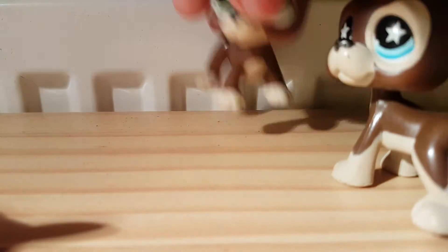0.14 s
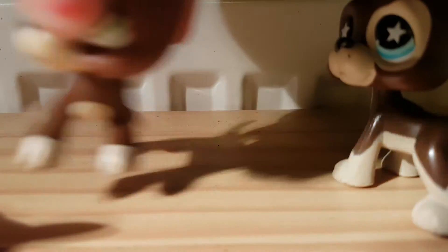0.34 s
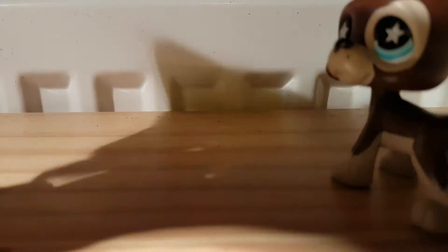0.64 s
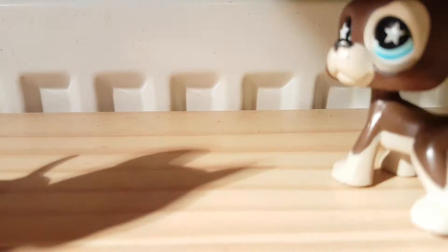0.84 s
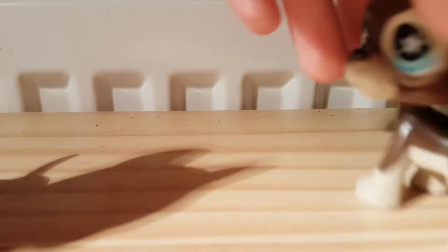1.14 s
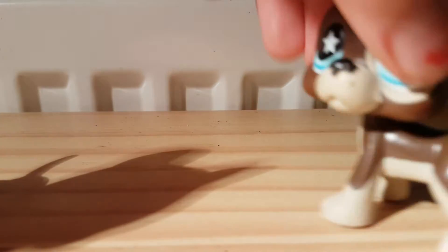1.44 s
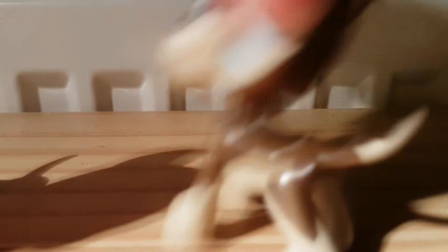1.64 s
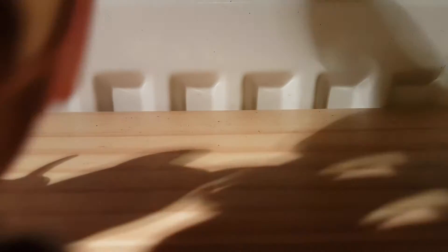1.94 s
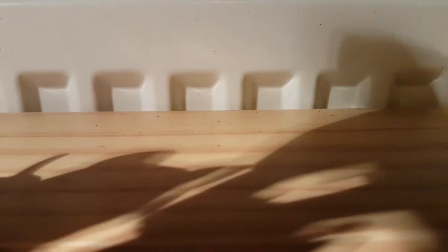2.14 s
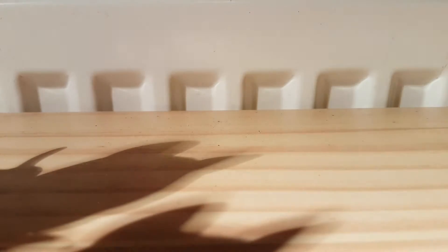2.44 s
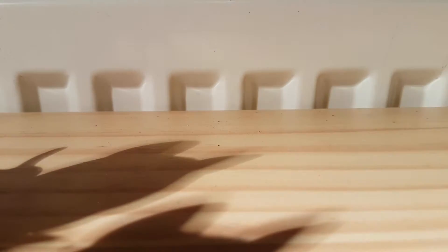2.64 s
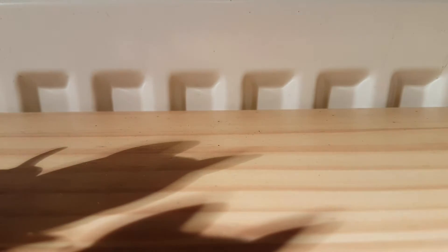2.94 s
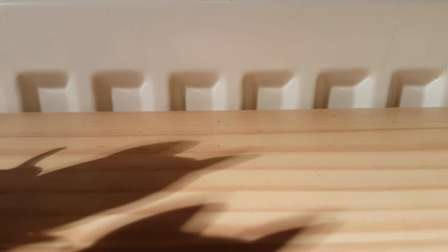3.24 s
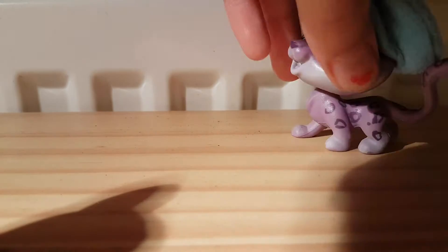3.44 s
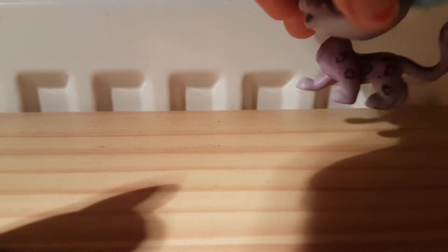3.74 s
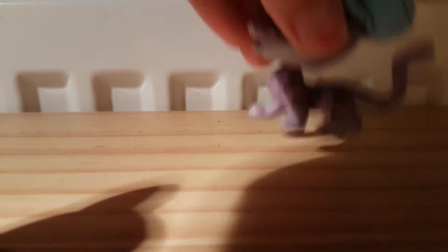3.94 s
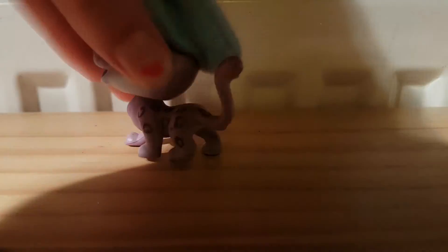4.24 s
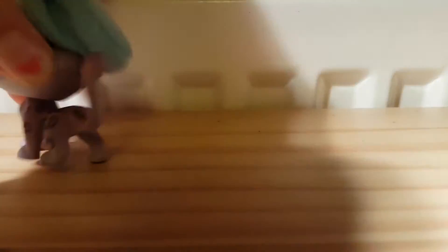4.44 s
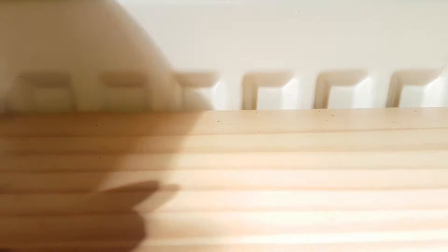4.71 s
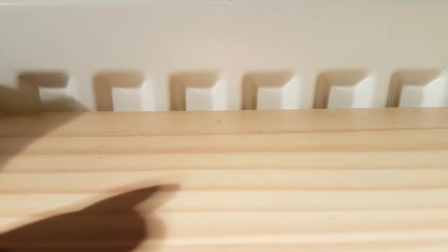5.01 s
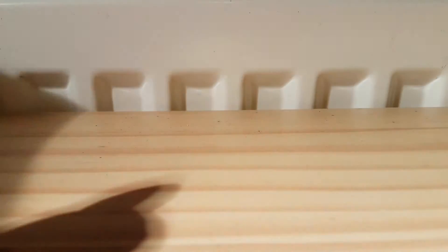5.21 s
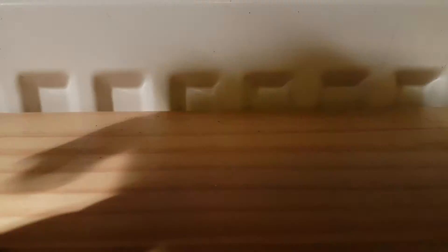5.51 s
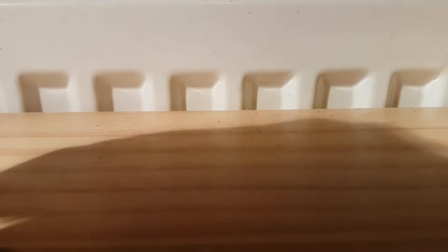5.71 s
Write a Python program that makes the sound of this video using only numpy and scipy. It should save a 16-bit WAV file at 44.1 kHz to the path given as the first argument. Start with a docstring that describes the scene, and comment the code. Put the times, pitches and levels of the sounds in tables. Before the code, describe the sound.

Hard plastic toy figures hop along a wooden shelf in quick knocking bursts, with light scrapes, clicks and short pauses in a quiet room.

```python
"""Plastic toy figures hopped along a wooden shelf

Three small figures in turn knock close to two microphone ports; a small, quiet room answers.
Knocks: a pulse, dense ringing, board and figure modes and room decay, coloured per contact.
A hop is two feet milliseconds apart, the hand's weight and a push-off; other knocks come singly.
Between hops, enveloped noise through resonant bodies makes slides and finger hiss; sharp clicks tick.
One dull bump is a short low swing; steady shaped noise is the room air."""
import sys
import numpy as np
from scipy import signal
from scipy.fft import rfft, irfft, next_fast_len
from scipy.io import wavfile
from scipy.ndimage import map_coordinates

SR = 44100
rng = np.random.default_rng(int(sys.argv[2]) if len(sys.argv) > 2 else 0)


def unload_wav(signal):
    """Save mono or channel-first audio to the path in sys.argv[1] as 16-bit WAV at rate SR, clipped to [-1, 1]."""
    wavfile.write(
        sys.argv[1],
        SR,
        np.round(np.clip(np.atleast_2d(signal).T, -1, 1) * 32767).astype(np.int16),
    )


N = 258867

# Modes of the wooden board. Each row: nominal frequency in Hz, level in dB, t60 in seconds,
# phase by which the left leads in radians.
BOARD_MODES = [(82, 1, 1, 0.5), (176.3, -5, 0.099, 0.5), (225, 0, 0.088, -1.84), (301, 2.5, 0.14, 1.8),
               (336, -1.5, 0.13, 1.5), (432.4, 0, 0.29, 2), (612.4, 2, 0.29, -0.9),
               (689.4, -8.5, 0.36, 1.5), (794.5, 6.5, 0.2, -1.66), (878, -0.5, 0.039, 0.98),
               (1220.4, 7.5, 0.06, 4), (1432, 2, .08, 1.5)]
# Modes of the plastic hound, same columns.
HOUND_MODES = [(860, 0, 0.082, 2.1), (1900, 6.5, .05, 0.63), (2380, 11.5, 0.034, 1.9),
               (2590, 11.5, 0.033, 1.8), (2850, 3, .05, 1.6), (3400, 5.5, 0.067, 0.63),
               (3980, 2, 0.058, 1.5)]


def amp(db):
    """Decibels to gain."""
    return 10 ** (np.asarray(db) / 20)


def unit(x):
    """Scaled to rms 1."""
    return x / np.sqrt(np.mean(x ** 2) + 1e-20)


def along(points, hz):
    """(Hz, value) points interpolated on a log-frequency axis."""
    point_hz, values = np.transpose(points)
    return np.interp(np.log(hz + 1), np.log(point_hz + 1), values)


def filtered(x, response):
    """x times a zero-phase response of frequency, zero-padded."""
    n = x.shape[-1]
    padded = next_fast_len(n + SR // 10)
    spectrum = rfft(x, padded) * response(np.fft.rfftfreq(padded, 1 / SR))
    return irfft(spectrum, padded)[..., :n]


def coloured(x, gain_db):
    """x through a minimum-phase filter (folded cepstrum), so that attacks stay sharp."""
    n = x.shape[-1]
    log_gain = np.log(amp(gain_db(np.fft.rfftfreq(n, 1 / SR))))
    cepstrum = irfft(log_gain, n)
    cepstrum[1:n // 2] *= 2
    cepstrum[n // 2 + 1:] = 0
    return irfft(rfft(x) * np.exp(rfft(cepstrum)), n)


def stereo(pair):
    """Two unrelated signals become left and right: alike in the bass, apart in the treble."""
    # Left-right correlation. Each row: frequency in Hz, correlation (0 to 1).
    likeness = [(165, .98), (280, .7), (450, .45), (1000, 0), (10000, 0)]

    def mid_side_gains(hz):
        angle = np.arccos(np.clip(along(likeness, hz), -1, 1)) / 2
        return np.array([np.cos(angle), np.sin(angle)])

    mid, side = filtered(pair, mid_side_gains)
    return np.array([mid + side, mid - side])


def add(track, s, sound):
    """Mixes a sound into the track at time s."""
    part = track[:, max(round(s * SR), 0):][:, :sound.shape[-1]]
    part += sound[:, :part.shape[-1]]


def dying(t60s, rise_s, size=16384):
    """Stereo noise that swells, then decays at a rate per frequency; energy even across frequency."""
    noise = rng.standard_normal((2, size))
    hz, t, z = signal.stft(noise, SR, nperseg=128)
    decay = amp(-60 * t / along(t60s, hz)[:, None])
    shape = decay * (1 - np.exp(-(t + 1 / SR) / rise_s))
    shape /= np.linalg.norm(shape, axis=1, keepdims=True)
    tail = signal.istft(z * shape, SR, nperseg=128)[1][:, :size]
    return unit(stereo(tail)) / np.sqrt(size)


def blow(direct_db, plate_db, room_db, lag_ms=0.11, absorb_db=2):
    """A contact as it arrives: a pulse, slightly later on the right, dense ringing, a duller room."""
    # Decay of the room. Each row: frequency in Hz, t60 in seconds.
    room_t60s = [(100, .27), (300, 0.27), (700, 0.11), (2000, 0.19), (5000, 0.16), (13000, 0.064)]
    # Dense ring of the board. Each row: frequency in Hz, t60 in seconds.
    plate_t60s = [(200, 0.038), (1000, 0.024), (3000, 0.028), (10000, 0.013)]
    room = filtered(dying(room_t60s, rise_s=0.0041), lambda hz: amp(-absorb_db * np.log2(1 + hz / 3000)))
    plate = dying(plate_t60s, rise_s=0.00018)
    sound = amp(plate_db) * plate + amp(room_db) * room
    sound[0, 0] += amp(direct_db)
    sound[1, round(lag_ms * SR / 1000)] += amp(direct_db)
    return sound


def ringing(modes, scatter_db, detune, size=16384):
    """Damped modes; strengths vary with the spot struck, pitch (detune as a fraction) with the grip."""
    t = np.arange(size) / SR
    hz, db, t60, lead = np.transpose(modes)[:, :, None]
    spot, grip = rng.standard_normal((2, len(modes), 1))
    damping = np.log(1000) / t60
    strength = amp(db + scatter_db * spot) * 2 * damping / SR
    ring = strength * np.exp((2j * np.pi * hz * (1 + detune * grip) - damping) * t)
    left = (ring * np.exp(0.5j * lead)).real.sum(0)
    right = (ring * np.exp(-0.5j * lead)).real.sum(0)
    return np.array([left, right])


def strokes(rows, shape):
    """Gain over time of (s, length s, dB) strokes: each takes hold, eases off and dies away."""
    attack_s, sag_db, release_db_per_s = shape
    gain = np.zeros(N)
    for s, length_s, db in rows:
        t = np.arange(N) / SR - s
        sag = sag_db * np.clip(t / length_s, 0, 1)
        release = release_db_per_s * np.maximum(t - length_s, 0)
        gain += np.clip(t / attack_s, 0, 1) * amp(db - sag - release)
    return gain


def rustle(spectrum, rough_db, rate_hz, body):
    """Friction of rms 1: noise whose grip varies randomly at rate_hz, sounding through a body."""
    knots = rng.standard_normal(N // 10)
    grip = amp(rough_db * map_coordinates(knots, [np.arange(N) * rate_hz / SR], order=1))
    friction = grip * rng.standard_normal((1, N))
    slips = signal.fftconvolve(friction, body, axes=1)[:, :N]
    return unit(filtered(slips, lambda hz: amp(along(spectrum, hz))))


def air():
    """Steady room rumble and microphone hiss: shaped stereo noise."""
    # The still room. Each row: frequency in Hz, spectral level in dB.
    air_spectrum = [(12, -38.5), (20, 3.5), (22, -13.5), (53, -6.5), (68, -17.5), (86, -4.5), (104, -7.5),
                    (130, -13), (1480, -25.5), (1610, -24), (2320, -26), (9670, -40), (16000, -30.5)]
    noise = stereo(rng.standard_normal((2, N)))
    return amp(-66.5) * unit(filtered(noise, lambda hz: amp(along(air_spectrum, hz))))


def bump(hz=84, swell_s=0.0081, early_s=0.00343, rebound_s=0.041, rebound_db=-14, rebound_swell_s=0.022):
    """A soft push swings the microphones' support for a few cycles; it rebounds more weakly."""
    # Each row: time in seconds, level in dB.
    bumps = [(2.663, -20)]
    track = np.zeros((2, N))
    t = np.arange(SR // 4) / SR
    push = np.exp(-(t / swell_s - 1.6) ** 2)
    rebound = amp(rebound_db) * np.exp(-((t - rebound_s - swell_s) / rebound_swell_s) ** 2)
    swing = (push + rebound) * np.sin(2 * np.pi * hz * t)
    for s, db in bumps:
        add(track, s - early_s, amp(db) * swing[None])
    return track


def finger_hiss():
    """Fingers shift on the plastic: bright friction noise in strokes."""
    # Each row: start in seconds, length in seconds, relative level in dB.
    finger_rows = [(0.0, 0.046, -77), (0.38, 0.38, -67), (1.155, 0.082, -69), (1.3, 0.28, -80),
                   (1.435, 0.015, -62.5), (1.78, 0.24, -83), (2.06, 0.05, -80), (2.17, 0.098, -66.5),
                   (2.28, 0.2, -61), (2.66, 0.057, -65), (3.51, 0.022, -71), (3.68, 0.032, -74),
                   (5.02, 0.06, -69), (5.68, 0.07, -68)]
    # Stroke shape: attack in seconds, sag over the length in dB, release in dB per second.
    finger_shape = (0.015, 4.5, 200)
    # Each row: frequency in Hz, spectral level in dB.
    hiss_spectrum = [(2000, -20), (4000, -3), (5500, 0), (8000, 0), (9500, -6), (12500, -3), (16000, -6)]
    skin = blow(direct_db=-6.5, plate_db=2.5, room_db=0.5)
    hiss = rustle(hiss_spectrum, rough_db=1.5, rate_hz=500, body=skin)
    return amp(-2) * strokes(finger_rows, finger_shape) * hiss


def sliding_feet():
    """Dragged feet: friction stirs the board's modes (rumble) and the hound's modes (scrape)."""
    # Each row: start in seconds, length in seconds, relative level in dB, scrape over that level in dB.
    slide_rows = [(0.0, 0.07, -53, -11.5), (0.37, 0.99, -60, -13), (0.694, 0.046, -43, -18.5),
                  (1.166, 0.079, -39.5, -7.5), (1.333, 0.16, -48, -12.5), (1.485, 0.048, -48, -11.5),
                  (1.77, 0.11, -48.5, -6), (1.9, 0.049, -37, -12), (2.0, 0.055, -48, -2),
                  (2.055, 0.048, -37.5, -8.5), (2.156, 0.06, -40.5, -12), (2.273, 0.16, -42.5, -15.5),
                  (2.649, 0.033, -47.5, -19), (3.489, 0.21, -61, -18), (3.654, 0.055, -51, -11),
                  (4.93, 0.13, -42, -16), (5.193, 0.084, -58.5, -12), (5.404, 0.16, -50, -20),
                  (5.69, 0.03, -49, -14.5), (5.815, 0.045, -55.5, -20)]
    # Stroke shape: attack in seconds, sag over the length in dB, release in dB per second.
    slide_shape = (0.015, 4, 220)
    # Board rumble. Each row: frequency in Hz, spectral level in dB.
    rumble_spectrum = [(60, -28.5), (110, -4.5), (190, -3.5), (400, -3), (640, 0.5), (900, -16),
                       (1500, -16), (3000, -53)]
    # Scrape. Each row: frequency in Hz, spectral level in dB.
    scrape_spectrum = [(500, -22), (950, 0), (1700, -1), (2700, 0), (3500, -7), (6000, -21)]
    drag = strokes([(s, length_s, db) for s, length_s, db, _ in slide_rows], slide_shape)
    bite = strokes([(s, length_s, db + scrape_db) for s, length_s, db, scrape_db in slide_rows], slide_shape)
    board = blow(direct_db=0, plate_db=-8, room_db=-12)
    board += amp(9) * ringing(BOARD_MODES, scatter_db=1, detune=0)
    figure = blow(direct_db=0, plate_db=-3, room_db=-8)
    figure += amp(-5) * ringing(HOUND_MODES, scatter_db=1, detune=0)
    rumble = amp(-1) * drag * rustle(rumble_spectrum, rough_db=1.5, rate_hz=120, body=board)
    scrape = bite * rustle(scrape_spectrum, rough_db=5, rate_hz=490, body=figure)
    return rumble + scrape


def ticks():
    """Plastic snaps on plastic, too light to stir the board's modes."""
    # Each row: time in seconds, relative level in dB.
    tick_rows = [(0.261, -38.5), (0.3917, -29.5), (0.536, -33), (0.698, -37), (1.4406, -37.5),
                 (1.545, -40.5), (1.5841, -30), (2.3482, -29), (3.52, -53.5), (4.1713, -43.5),
                 (4.368, -43.5), (4.555, -41), (4.757, -40.5), (4.937, -38)]
    snap = [(300, -32), (1500, -11.5), (4000, 9), (8500, -7.5), (12500, 0.5), (16000, -8.0)]  # (Hz, dB)
    track = np.zeros((2, N))
    for s, db in tick_rows:
        sound = blow(direct_db=13, plate_db=4, room_db=1)
        add(track, s, amp(db) * coloured(sound, lambda hz: along(snap, hz)))
    return track


def figure_at(s):
    """Modes and feet of the figure in the hand at time s: puppy, then hound, then leopard."""
    # Modes. Each row: nominal frequency in Hz, level in dB, t60 in seconds, left lead in radians.
    puppy_modes = [(1100, 4.9, .09, 4.7), (1976, 8, 0.049, 1), (2610, 10, 0.067, 1.4),
                   (3080, 3.7, 0.053, 0.59), (3400, 8, 0.079, 0.84)]
    # Same columns.
    leopard_modes = [(1347, -8, 0.02, 1.7), (1864, 5.5, 0.053, 0.37), (2015, -38.5, 0.099, 2.1),
                     (3407, 8.5, 0.059, 0.83)]
    # Foot colour relative to the knock: thud in dB, tick in dB (before the edge's share).
    puppy_feet = (-5.5, 0)
    # Same columns.
    hound_feet = (0, -3.5)
    # Same columns.
    leopard_feet = (-7.5, 0.96)
    if s < 1.15:
        return puppy_modes, puppy_feet
    if s < 3:
        return HOUND_MODES, hound_feet
    return leopard_modes, leopard_feet


def crack(db, t60_s=0.0056, corner_hz=11000, size=16384):
    """The brief top-octave crack of a hard plastic edge: decaying noise, high-passed."""
    decay = amp(-60 * np.arange(size) / SR / t60_s)
    burst = unit(rng.standard_normal((2, size)) * decay) / np.sqrt(size)
    return amp(db) * filtered(burst, lambda hz: 1 - 1 / (1 + (hz / corner_hz) ** 8))


def hop_contacts():
    """A hop is four contacts: one foot, the other, the hand's weight and the push-off."""
    # Each row: start in seconds, rap of the spot in dB, first foot in dB, its edge in dB,
    # second foot's delay in seconds, its level in dB, its edge in dB,
    # push-off delay in seconds, push-off level in dB.
    hop_rows = [(0.3038, 4, -7, -0.5, 0.003, -5.5, 2.5, 0.053, -28),
                (0.4763, -3.5, -2.5, 3, 0.0101, -8.5, -1.5, 0.0596, -12),
                (0.6465, -2, -11.5, -0.5, 0.0162, -3.5, -2.5, 0.055, -22),
                (1.723, -11, -9, 11.5, 0.022, -21.5, -10.5, 0.056, -36.5),
                (1.876, -14.5, -22, 6.5, 0.0105, -2, 0.5, 0.0545, -19),
                (3.8863, 6, -8, 4, 0.0082, -7.5, -2, 0.0636, -16),
                (4.108, 7, -11.5, 2.5, 0.0076, -6, -2.5, 0.052, -18),
                (4.2992, 4.5, -12, 5.5, 0.0063, -10, 2, 0.052, -20),
                (4.4986, 5.5, -10, 5, 0.0044, -6, -6, 0.0534, -22),
                (4.68, 5.5, -11, 1, 0.005, -11, -7.5, 0.068, -18.5),
                (4.8905, 1, -14, 4.5, 0.009, -7, -14, 0.042, -24)]
    # The hand's weight: knock in dB; thud, rap and edge in dB relative to it.
    settle = (-18, 13, 0.5, -5.5)
    # Push-off relative to its knock: thud, rap and edge in dB.
    push_off = (0.95, -1, -3)
    settle_s = 0.0053  # after the second foot
    rap_follows = 0.6  # a harder edge lifts the rap, dB per dB
    contacts = []
    for s, rap_db, first_db, first_edge_db, gap_s, second_db, second_edge_db, stay_s, push_db in hop_rows:
        _, (thud_db, _) = figure_at(s)
        first_rap_db = rap_db + rap_follows * first_edge_db
        second_rap_db = rap_db + rap_follows * second_edge_db
        contacts += [(s, first_db, thud_db, first_rap_db, first_edge_db),
                     (s + gap_s, second_db, thud_db, second_rap_db, second_edge_db),
                     (s + gap_s + settle_s, *settle),
                     (s + stay_s, push_db, *push_off)]
    return contacts


def taps():
    """Every contact strikes the same board and rings its figure; hard edges sound bright, soles dull."""
    # Single knocks as a figure is nudged, tipped or set down. Each row: time in seconds,
    # knock in dB; thud, rap and edge in dB relative to it.
    single_taps = [(0.021, -40, -0.5, 7.5, 3.5), (0.123, -44, 7, 0, -10), (0.261, -32.5, -0.5, -4.5, 6.5),
                   (0.63, -23, 0.5, -6, 6), (0.759, -14, 6, -3, -6.5), (0.77, -27.5, -2, 8, 0.5),
                   (0.915, -23, 2.5, -6.5, -14.5), (0.934, -28, 3.5, -3, -10), (0.988, -37, -5, -17, -29),
                   (1.03, -44, 15, 4, -14), (1.047, -31, -9, -19, -15), (1.096, -28, -7, -12.5, -21.5),
                   (1.184, -13.5, -19.5, -9.5, -20.5), (1.212, -19, -7, -3, -5.5),
                   (1.295, -14.5, -12, 0, -14.5), (1.394, -14.5, 5, -4.5, -5), (1.532, -24, -3, -5.5, -8.5),
                   (1.547, -25.5, 0, -3, -2.5), (2, -31, 15, 8, 8), (2.052, -10.5, 7, -21, -0.5),
                   (2.171, -18.5, -1.5, -34, -21.5), (2.276, -23, 7, -5.5, -7.5),
                   (2.323, -20, 0.5, -29, -21), (2.349, -29.5, 8, -6, -0.5), (2.424, -28, 4, -4.5, -11),
                   (2.454, -32, 8.5, -17, -10), (3.687, -32, -5, 1.5, -10.5),
                   (5.019, -12, -7.5, -11.5, -13), (5.461, 3, -5, -14.5, -22),
                   (5.6237, -19.5, 3, -20.5, -23), (5.636, -22.5, -10, 2, -6.5),
                   (5.732, -24.5, 3, -18.5, -18.5), (5.82, -40, 8.5, -15, -7.5), (5.864, -32, -1, -10, -24)]
    # Centres of thud, knock, rap, edge and tick in Hz.
    band_hz = [230, 600, 1200, 2800, 8000]
    # Average tap. Each row: frequency in Hz, spectral level in dB.
    wood_spectrum = [(30, -46), (75, -9), (145, -12.5), (180, -1.5), (380, -5), (615, 0.5), (1000, -3.5),
                     (1700, -10.5), (3400, -19.5), (4200, -22.5), (8000, -34), (9400, -43.5),
                     (12500, -39.5), (16000, -51)]
    tick_follows = 0.99  # a harder edge lifts the tick, dB per dB
    track = np.zeros((2, N))
    for s, db, thud_db, rap_db, edge_db in hop_contacts() + single_taps:
        figure_modes, (_, tick_db) = figure_at(s)
        band_db = [thud_db, 0, rap_db, edge_db, tick_db + tick_follows * edge_db]
        contact = list(zip(band_hz, band_db))
        sound = blow(direct_db=20.5, plate_db=26.5, room_db=23.5) + crack(db=25.5)
        sound += amp(26.5) * ringing(BOARD_MODES, scatter_db=2, detune=0.008)
        sound += amp(27.5) * ringing(figure_modes, scatter_db=3.5, detune=0.029)
        knock = coloured(sound, lambda hz: along(wood_spectrum, hz) + along(contact, hz))
        add(track, s, amp(db) * knock)
    return track


def scene():
    """All sources at the two microphone ports."""
    return air() + bump() + finger_hiss() + sliding_feet() + ticks() + taps()


def record(dry):
    """Ports differ a little in colour; the highest peaks are rounded off; then a band limit."""
    # Port colour. Each row: frequency in Hz, dB more on the left and less on the right.
    port_colour = [(200, 1), (700, 0.5), (1300, -.7), (4000, -0.5), (8000, -0.5), (12000, 1.5)]
    top_hz = 16300
    heard = filtered(dry, lambda hz: amp(np.outer([1, -1], along(port_colour, hz))))
    rounded = heard / (1 + np.abs(heard / 0.8) ** 6) ** (1 / 6)
    return filtered(rounded, lambda hz: hz < top_hz)


dry = scene()
out = record(dry)
unload_wav(out)
```